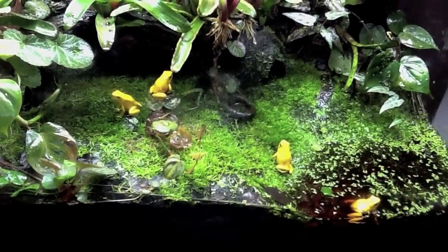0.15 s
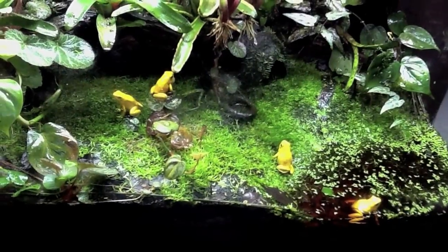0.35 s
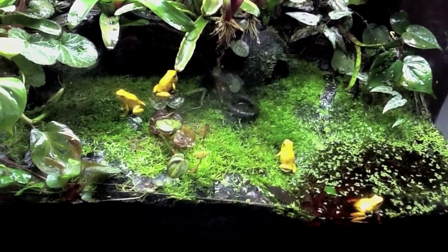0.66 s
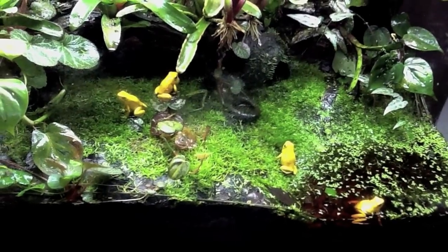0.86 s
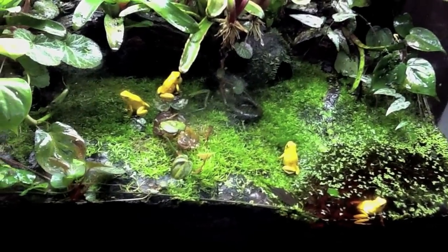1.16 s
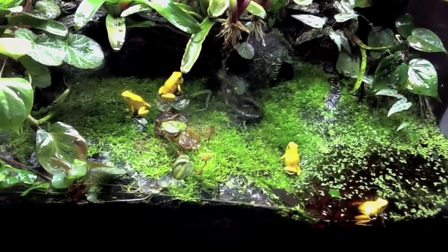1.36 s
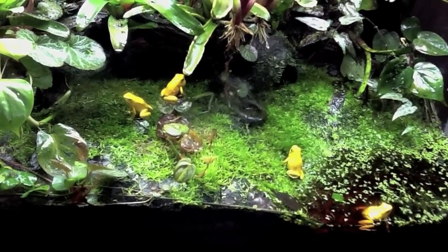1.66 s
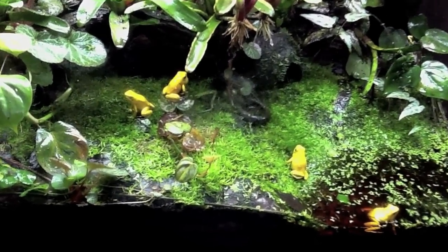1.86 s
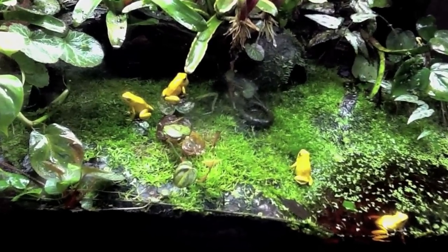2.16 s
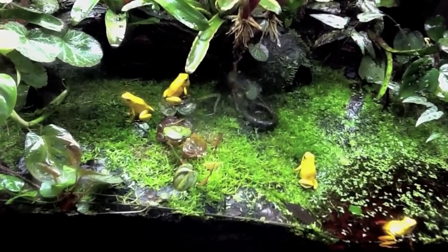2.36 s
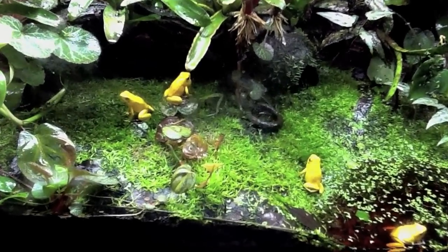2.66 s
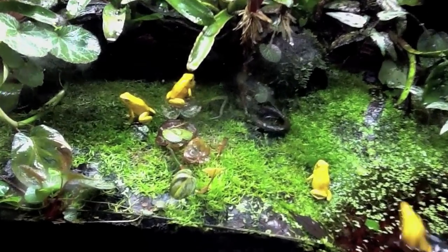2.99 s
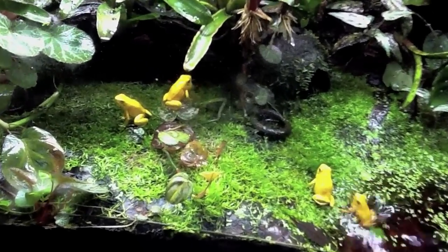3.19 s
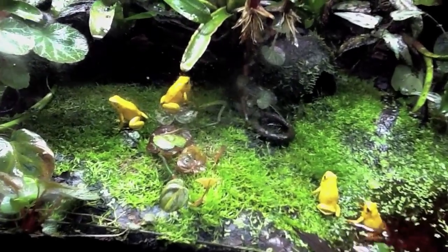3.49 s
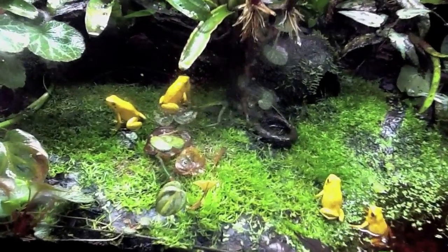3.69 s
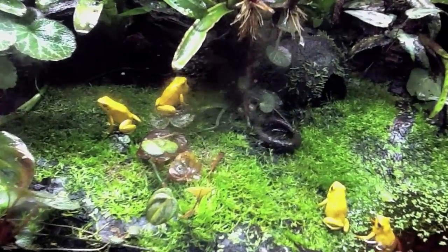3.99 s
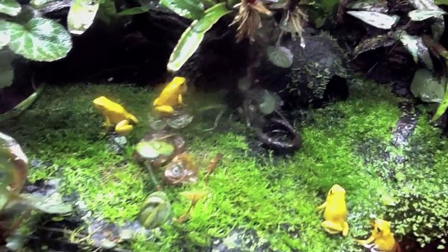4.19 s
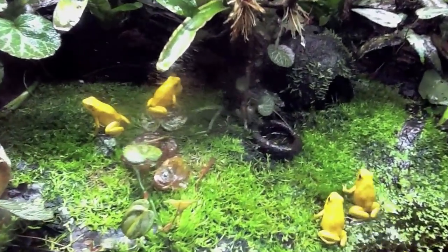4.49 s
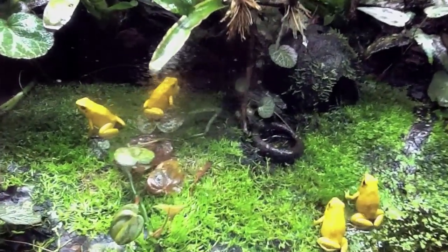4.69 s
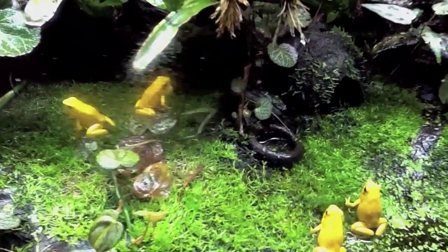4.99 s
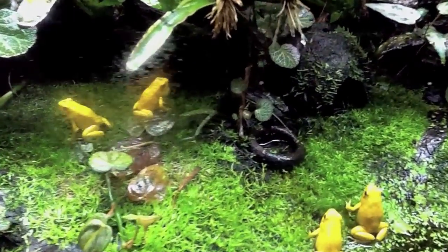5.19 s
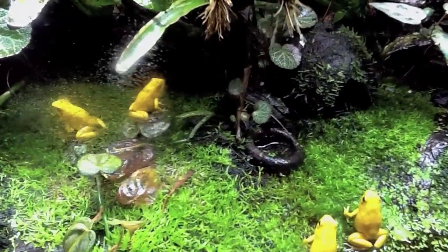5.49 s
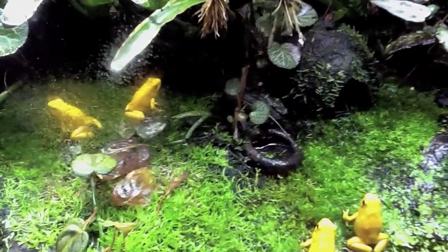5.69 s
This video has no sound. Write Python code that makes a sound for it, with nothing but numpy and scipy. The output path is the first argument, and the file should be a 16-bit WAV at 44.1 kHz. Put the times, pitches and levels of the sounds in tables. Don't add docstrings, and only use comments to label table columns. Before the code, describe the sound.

A small frog gives a rapid, clicky, whistling trill in a glass terrarium, swelling then stopping, over a low steady fan hum.

```python
import sys
import numpy as np
from scipy import signal
from scipy.fft import rfft, irfft
from scipy.io import wavfile
from scipy.ndimage import map_coordinates

SR = 44100
rng = np.random.default_rng(int(sys.argv[2]) if len(sys.argv) > 2 else 0)


def volts(x):
    e = np.asarray(x, float) / 20
    return 10 ** e


def transcribe(u):
    v = np.clip(np.atleast_2d(u).T, -1, 1)
    q = np.round(v * 32767).astype(np.int16)
    wavfile.write(sys.argv[1], SR, q)


N = 257984


def line(points, at):
    return np.interp(at, *np.transpose(points))


def wobble(rate, size):
    knots = rng.standard_normal(int(size * rate / SR) + 4)
    return map_coordinates(knots, [np.arange(size) * rate / SR])


def coloured(gain, size):
    noise = irfft(rfft(rng.standard_normal(size)) * gain(np.fft.rfftfreq(size, 1 / SR)), size)
    return noise / noise.std()


def add(track, s, sound):
    track[round(s * SR):][:len(sound)] += sound


def phase(hz):
    return 2 * np.pi * np.cumsum(hz) / SR


# first note t/s, last note t/s, number of notes
NOTE_RUNS = [(.2375, .2375, 1), (.622, .811, 3), (1.0048, 1.3905, 5), (1.5843, 1.7805, 3),
             (2.0734, 2.4612, 5), (2.5546, 2.6598, 2), (2.763, 3.2475, 6), (3.3468, 4.5295, 13),
             (4.6384, 4.6384, 1)]
# t/s, peak level/dB, top pitch f/Hz, low voice level/dB, note length t/s
CALL_EFFORT = [(.24, -23.5, 1410, -4, .032), (0.618, -23.5, 1405, 1, 0.04), (1.285, -21.5, 1408, .5, 0.04),
               (1.397, -19.5, 1427, -13, 0.04), (1.576, -21, 1438, 3.5, 0.043),
               (1.78, -21.5, 1441, 1, .038), (2.173, -20, 1459, -4.5, 0.039), (2.27, -21, 1459, -1, 0.044),
               (2.6, -21.5, 1439, 3.5, 0.045), (2.762, -20.5, 1458, -4, 0.04),
               (2.893, -20.5, 1452, 4, .047), (3.111, -21.5, 1457, 4.5, 0.042),
               (3.439, -17.5, 1477, -13, .04), (3.549, -19.5, 1445, 0.5, .038),
               (3.744, -18.5, 1459, -6, 0.036), (3.868, -19.5, 1458, 6.5, 0.039),
               (4.097, -19, 1462, -7, .04), (4.64, -21.5, 1462, -8, 0.038)]


def notes():
    s = np.concatenate([np.linspace(first, last, round(count)) for first, last, count in NOTE_RUNS])
    times, *columns = np.transpose(CALL_EFFORT)
    db, top_hz, low_db, length = (np.interp(s, times, column) for column in columns)
    bright_db = 0.45 - 0.094 * (db + 21) ** 2
    bright_db += -3.8 * (s == s[0])
    chance = rng.standard_normal((len(s), 2))
    scatter_db, scatter_hz = 0.5 * chance[:, 0], 7.6 * chance[:, 1]
    return np.transpose([s, db + scatter_db, top_hz + scatter_hz, low_db, bright_db, length])


def habit(rate, count, size, change):
    fresh = np.array([wobble(rate, size) for _ in range(count)])
    return signal.lfilter([change], [1, -np.sqrt(1 - change ** 2)], fresh, axis=0, zi=fresh[-1:])[0]


# f/Hz, level/dB, decay by 60 dB t/s
THROAT_MODES = [(1458, -59, 0.026), (1553, -32, 0.063), (1900, -38.5, 0.032), (2300, -27.5, 0.02),
                (3100, -28, 0.0053)]


def snap(t):
    ring = 0
    for hz, level_db, t60 in THROAT_MODES:
        decay = volts(level_db + rng.normal(0, 1.4) - 60 * t / t60)
        ring += decay * np.sin(2 * np.pi * hz * rng.normal(1, 0.011) * t)
    return ring * (1 - np.exp(-t / 0.00099))


# main voice level/dB, its lean from start to end of the note level/dB,
# low voice level/dB, low voice peak as a share of the note
VOICE_OVERTONES = [(-3, 5, -10, 0.84), (-1, 9.5, 1.5, 0.526), (-11.5, -15.5, -7, 0.47),
                   (-26, -2, -20.5, 0.49), (-30.5, -17, -25, 0.37), (-27, -5, -38, 0.69)]
PITCH_ARCH = [(0, -0.7), (.18, 0.26), (.42, 0.067), (.64, 1), (.8, 1), (1, -1.8)]
# share of the note, level/dB
LOUDNESS_ARCH = [(0, -10.5), (.1, -5), (.4, 1.5), (.65, 0.73), (.8, 1), (.96, -4), (1, -7)]


def trill():
    slack_hz = 1383.8
    out, t = np.zeros(N), np.arange(SR // 12) / SR
    score = notes()
    shake = 0.01 * habit(161.3, len(score), len(t), change=0.46)
    flutter = [(0.54 + 0.091 * k) * habit(240 + 40 * k, len(score), len(t), change=0.62)
               for k in range(len(VOICE_OVERTONES))]
    for n, (s, db, top_hz, low_db, bright_db, length) in enumerate(score):
        share = t / length
        rise_hz = top_hz - slack_hz
        warm = max(s - 3.12, 0)
        strain = 0.35 + 0.65 * np.clip(rise_hz / 60, 0, 1)
        uneven = 1 + strain * shake[n]

        scoop_hz = 55 * warm * np.exp(-share / 0.15)
        main = phase((slack_hz + rise_hz * line(PITCH_ARCH, share) - scoop_hz) * uneven)
        low_rest_hz = slack_hz + 25.17 * warm - 25
        low = phase((low_rest_hz - rise_hz * (0.43 + 1.31 * share)) * uneven)

        swell = volts(line(LOUDNESS_ARCH, share)) * (share < 1)
        colour_db = [-2 - warm, -2.5 + warm, -0.0583 * (top_hz - 1445), 0, 0, 0]
        note = 0
        for k, (main_db, lean_db, second_db, peak) in enumerate(VOICE_OVERTONES):
            effort = swell ** (1 + 0.29 * k) * volts(k * bright_db + 0.41 * max(k - 2, 0) * (db + 18))
            tilt_db = lean_db - 0.43 * warm * max(lean_db, 0)
            level = volts(main_db + colour_db[k] + tilt_db * (share - 0.5)) * effort
            note += level * (1 + strain * flutter[k][n]) * np.sin((k + 1) * main)
            bump = np.exp(-((share - peak) / 0.092) ** 2)
            note += volts(second_db + low_db) * bump * np.sin((k + 1) * low)
        add(out, s, snap(t) + volts(db - 9) * note)
    return out


# t/s, peak level/dB, top pitch f/Hz, end pitch f/Hz, length t/s
BROKEN_NOTES = [
    (1.495, -37.5, 1861, 1280, 0.025),
    (1.884, -34.5, 1900, 1280, 0.026),
    (1.983, -34, 1930, 1260, .027),
]


def squeaks():
    out = np.zeros(N)
    for s, db, top_hz, end_hz, length in BROKEN_NOTES:
        share = np.arange(round(length * SR)) / (length * SR)
        turn = phase(line([(0, .9 * top_hz), (.55, top_hz), (.7, 0.867 * top_hz), (1, end_hz)], share))
        swell = volts(line([(0, -45), (.35, 5), (.6, -6), (.7, 6.5), (.9, 3), (1, -42)], share))
        swell = swell * (1 + 0.15 * wobble(290, len(share)))
        octave = volts(line([(0, -40), (.6, -25), (.7, -28), (1, 7.5)], share))
        add(out, s, volts(db) * swell * (np.sin(turn) + octave * np.sin(2 * turn)))
    return out


# delay t/s, level/dB
PANE_ECHOES = [(.0023, -19.5), (.0047, -10), (.0081, -12), (0.0129, -12.5), (0.021, -14)]
# f/Hz, decay by 60 dB t/s
ROOM_DECAY = [(1000, 0.38), (1500, 0.24), (3000, 0.28), (4500, 0.17), (9000, 0.29)]
# f/Hz, level/dB, decay by 60 dB t/s
CASE_MODE = [(1462, -36.5, 0.21)]


def terrarium(x):
    out = x + sum(volts(db) * np.pad(x, (round(s * SR), 0))[:N] for s, db in PANE_ECHOES)

    hz, t, z = signal.stft(rng.standard_normal((2, SR // 3)), SR, nperseg=256)
    decay = volts(-60 * t / line(ROOM_DECAY, hz)[:, None])
    tails = signal.istft(z * decay, SR, nperseg=256)[1]
    tails = tails / np.linalg.norm(tails[0])
    late = np.pad(x, (400, 0))[None]
    wet = signal.fftconvolve(late, tails, axes=1)[:, :N]

    age = np.arange(SR // 3) / SR
    ring = sum(volts(db - 25.5 - 60 * age / t60) * np.sin(2 * np.pi * mode_hz * age)
               for mode_hz, db, t60 in CASE_MODE)
    out += signal.fftconvolve(x, ring)[:N]

    drift = np.arange(N) / N * np.pi / 2
    return out + volts(-8.5) * (np.cos(drift) * wet[0] + np.sin(drift) * wet[1])


# f/Hz, rms level/dB
SHAFT_ORDERS = [(131, -64.5), (175, -61), (219, -52), (307, -66.5), (483, -68)]
# f/Hz, level per Hz/dB
AIR_SPECTRUM = [(25, -46), (50, -33), (70, -36), (90, -14.5), (130, -12.5), (195, -2), (250, -9),
                (330, -12), (460, -12.5), (600, -18), (1000, -23.5), (1500, -26.5), (3300, -28),
                (15300, -30)]


def fan():
    speed = np.cumsum(1 + 0.004 * wobble(3.61, N)) / SR
    hum = 0
    for hz, db in SHAFT_ORDERS:
        level = np.sqrt(2) * volts(db + 1.37 * wobble(9, N))
        hum += level * np.sin(2 * np.pi * (hz * speed + rng.random()))
    air_hz, air_db = np.transpose(AIR_SPECTRUM)
    air = coloured(lambda hz: volts(np.interp(np.log(hz + 1), np.log(air_hz), air_db)), N)
    return hum + volts(-47) * air


# t/s, peak level/dB, centre f/Hz, width
# f/Hz, decay by 60 dB t/s
NOISE_PUFFS = [
    (.242, -30.5, 2300, 1200, 0.088),
    (.47, -43.5, 2190, 3500, 0.23),
    (2.686, -40, 12100, 8900, .035),
    (4.016, -39, 13300, 4030, 0.033),
    (4.014, -40, 5000, 5500, 0.046),
    (5.241, -50, 3020, 3000, 0.1),
    (5.49, -49, 3500, 4000, 0.11),
]


def camera():
    out, t = np.zeros(N), np.arange(SR // 5) / SR
    for s, db, centre_hz, width_hz, t60 in NOISE_PUFFS:
        rise_s = 0.0079 * (10 * t60) ** 1.15
        puff = coloured(lambda hz: np.exp(-(2 * (hz - centre_hz) / width_hz) ** 2), len(t))
        add(out, s, volts(db - 60 * t / t60) * (1 - np.exp(-t / rise_s)) * puff)
    return out


def scene():
    no_bass = signal.butter(3, 950, "highpass", fs=SR, output="sos")
    frog = signal.sosfilt(no_bass, trill() + squeaks())
    return (terrarium(frog) + fan() + camera())[None]


# lower edge f/Hz, upper edge f/Hz
MASKED_BANDS = [(1740, 1880), (3200, 3470), (4780, 5080)]


def thin(x, margin_db, cut_db):
    hz, t, z = signal.stft(x, SR, nperseg=1536)

    def power(lo, hi):
        return np.mean(abs(z[:, (hz > lo) & (hz < hi)]) ** 2, axis=1, keepdims=True)

    for lo, hi in MASKED_BANDS:
        margin = margin_db + rng.normal(0, 2.5, len(t))
        hidden = power(lo, hi) < power(lo - 500, lo) * volts(-2 * margin)
        z[:, (hz > lo) & (hz < hi)] *= np.where(hidden, volts(cut_db), 1)
    below_top = (hz < 15400)[:, None]
    return signal.istft(z * below_top, SR, nperseg=1536)[1][:, :N]


def top_cut(x):
    return signal.sosfilt(signal.butter(12, 15690, fs=SR, output="sos"), x)


def record(dry):
    mix = thin(dry, margin_db=22, cut_db=-22)
    return top_cut(mix)


dry = scene()
out = record(dry)
transcribe(out)
```